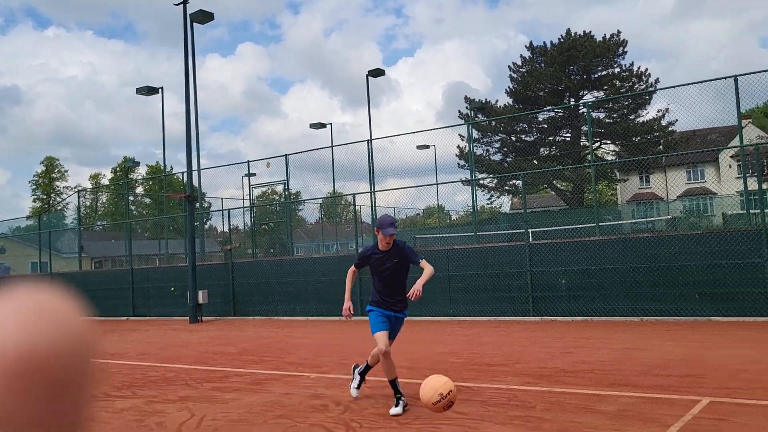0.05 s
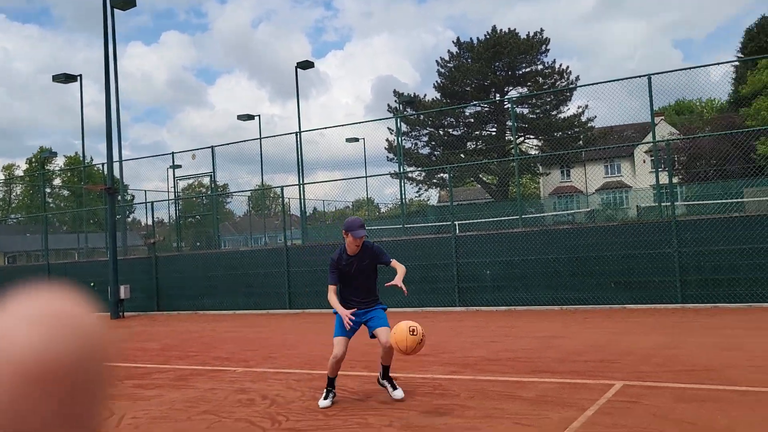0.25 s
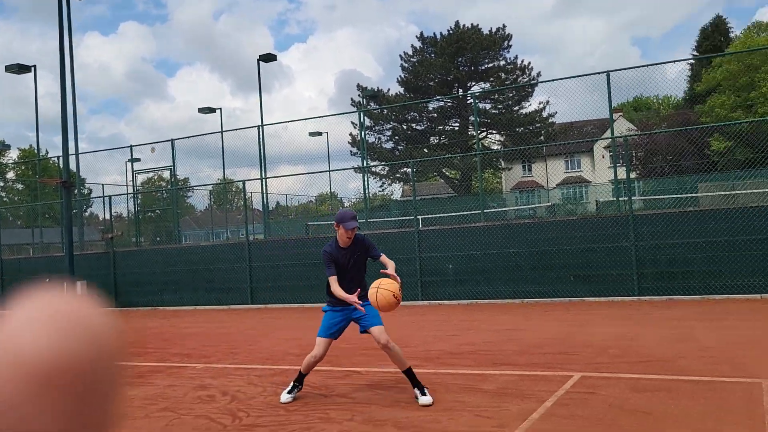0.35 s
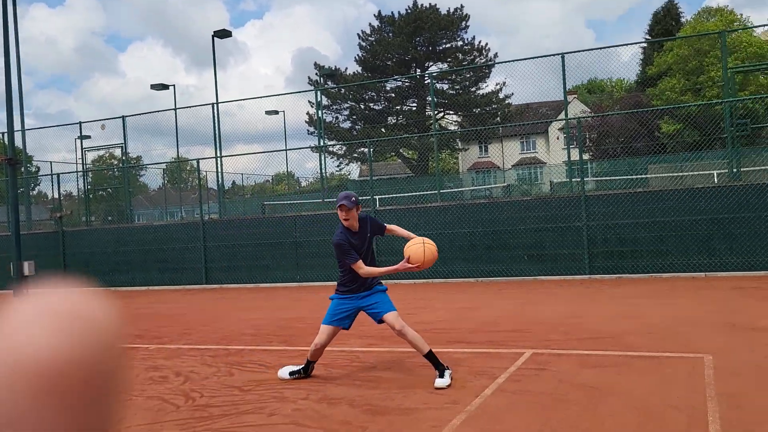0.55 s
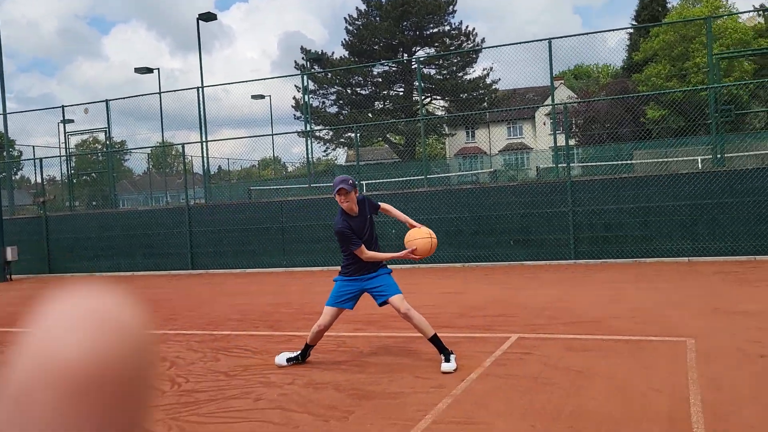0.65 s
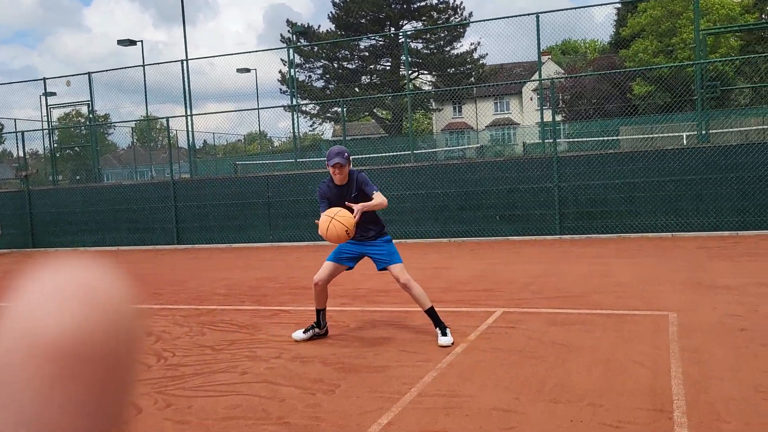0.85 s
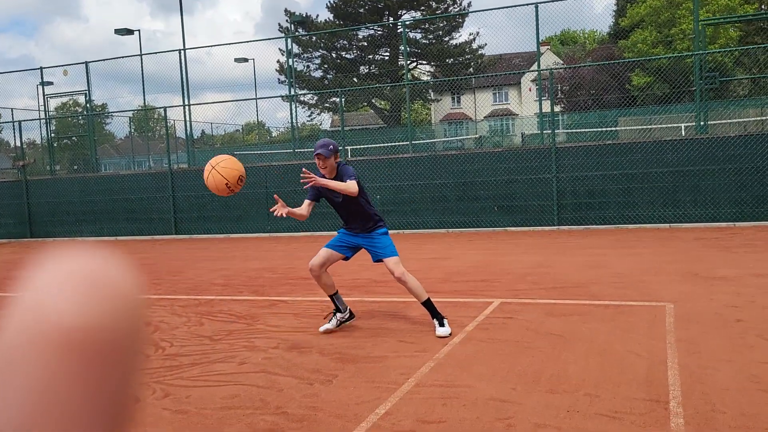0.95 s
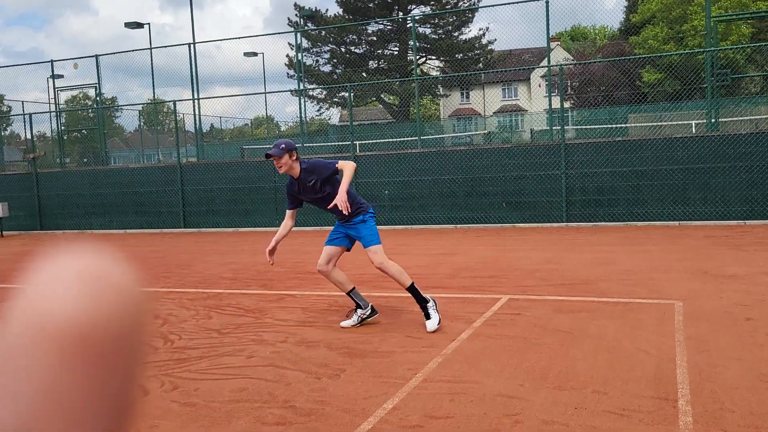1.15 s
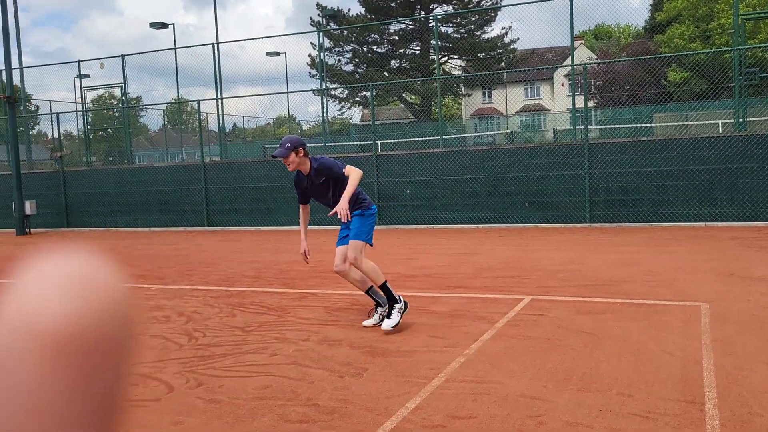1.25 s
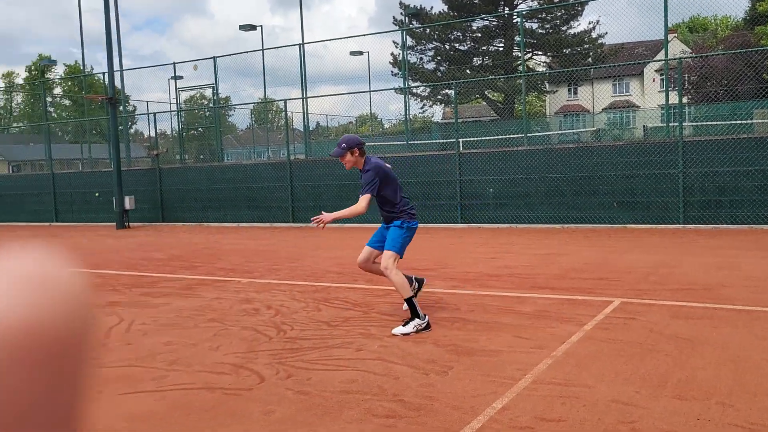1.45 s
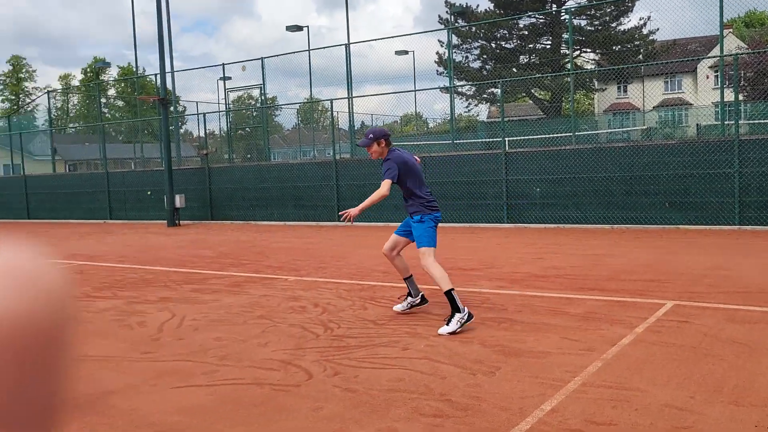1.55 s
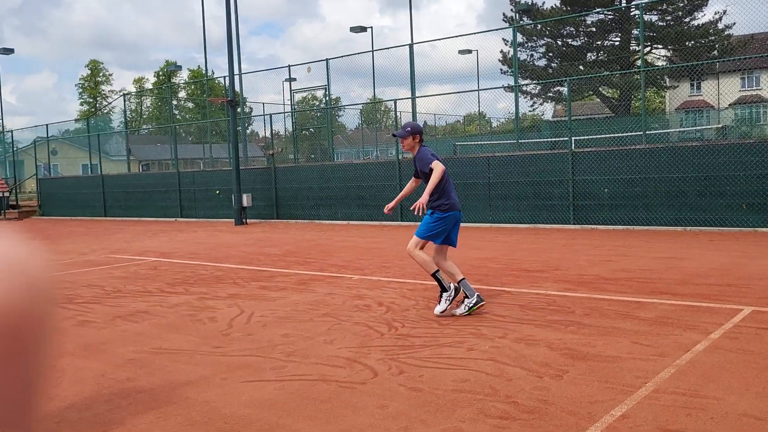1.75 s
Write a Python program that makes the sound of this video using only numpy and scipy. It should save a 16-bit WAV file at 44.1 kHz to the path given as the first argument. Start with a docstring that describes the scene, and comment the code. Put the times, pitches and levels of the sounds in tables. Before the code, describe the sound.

Gritty shoe slide across outdoor clay, with a large ball's thump and thudding steps.

```python
"""Ball play on an outdoor clay court, heard through the two ports of a phone a few metres away.
Wind, distant town noise and faint bird whistles from the start. A step and a scuff; a large ball
smacks the clay and booms with its air cavity. The player catches it in a long slide: soles roll
loose grit, the tread rasps and shudders. Then a push-off and a step away, feet thudding and
crumbs cracking under them."""
import sys
import numpy as np
from scipy import signal
from scipy.fft import rfft, irfft
from scipy.io import wavfile
from scipy.ndimage import uniform_filter1d, map_coordinates

SR = 44100
rng = np.random.default_rng(int(sys.argv[2]) if len(sys.argv) > 2 else 0)


def master_out(mix):
    """Clip the mix to full scale and print it as 16-bit PCM to the path in sys.argv[1]."""
    frames = np.transpose(np.atleast_2d(mix))
    ceiling = np.clip(frames, -1, 1)
    pcm = np.round(ceiling * 32767).astype(np.int16)
    wavfile.write(sys.argv[1], SR, pcm)


N = 79380
T = np.arange(N) / SR
FREQS = np.maximum(np.fft.rfftfreq(N, 1 / SR), 1)

# distant town and trees: freq_hz, gain_db
TOWN_SPECTRUM = [(25, 5.5), (70, -11), (150, -1), (400, -13), (1000, -12.5), (1600, -21), (2400, -17.5),
                 (3700, -22.5), (6000, -31), (9000, -49), (13000, -38.5), (16000, -42)]
# wind rumble: freq_hz, gain_db
WIND_SPECTRUM = [(20, -57), (36, 3), (54, 0.5), (85, -5.5), (130, -16.5), (250, -30), (1000, -62.5)]
# wind envelope: time_s, gain_db
WIND_ENVELOPE = [(0, -57), (.04, -68), (.08, -47.5), (.15, -55), (.44, -49), (.55, -38.5), (.595, -37.5),
                 (.65, -50.5), (.78, -49), (.95, -55), (1.23, -51.5), (1.27, -73), (1.32, -45), (1.65, -56)]
# bird notes: start_s, length_s, first_hz, middle_hz, last_hz, level_db, roughness_ratio
BIRD_NOTES = [(0, .05, 3750, 3300, 2750, -63.5, .6), (0, .06, 2150, 2170, 2120, -67, .1),
              (.047, .03, 3850, 3600, 3480, -57, .9), (.08, .045, 3200, 2850, 2500, -62, .8),
              (.308, .098, 2320, 2710, 2380, -54.5, .2), (1.145, .04, 3900, 3830, 3650, -63, .9),
              (1.16, .1, 4580, 4330, 4480, -64, .9), (1.2, .06, 3550, 3520, 3330, -61.5, .9),
              (1.26, .035, 3500, 3570, 3400, -56.5, .9), (1.29, .055, 3540, 3440, 3520, -60, 1),
              (1.345, .035, 3700, 3790, 3800, -58.5, .7)]
# near reflection, side relative to mid: freq_hz, gain_db
SIDE_RESPONSE = [(110, -20.5), (280, -35), (500, -12.5), (12000, -5)]
# left port relative to right: freq_hz, gain_db
PORT_BALANCE = [(100, 2.5), (600, -1.5), (870, 7), (1600, -0.5), (2200, 9), (3500, 14), (4000, 3),
                (5800, 7), (10000, 2), (14000, -10.5), (16000, -12)]
# right port behind left: time_s, lag_s
PORT_LAGS = [(.48, 0.0000041), (.8, 0.0001), (1.4, 0.00012), (1.7, 0.000055)]
# crumbs bursting under sole or ball: start_s, crack_db, tick_db, t60_s
CRUMB_CRACKS = [(0.054, -43.5, -72, 0.011), (0.2069, -35, -65, 0.011), (0.2536, -63, -80, 0.0083),
                (1.3786, -36.5, -41, 0.027), (1.7303, -56.5, -59, 0.026), (1.777, -58, -53.5, 0.012)]
# bursting crumb: freq_hz, gain_db
CRACK_SPECTRUM = [(500, -30), (1500, -15), (2400, 7.5), (3400, 4), (4700, 3), (7800, -6.5), (9500, -15.5),
                  (13000, -16), (16000, -3)]
# tread rasps: start_s, rise_s, hold_s, release_s, level_db, centre_hz, width_hz
TREAD_RASPS = [(0.053, 0.0027, 0.0016, 0.0088, -51, 4880, 1500),
               (0.126, 0.019, 0.016, 0.066, -49.5, 1230, 446), (.435, .02, 0.064, 0.11, -46, 4560, 1310),
               (0.866, .09, .03, 0.15, -62, 14200, 1250)]
# sole biting the clay: start_s, rise_s, hold_s, release_s, level_db
SOLE_SHUDDERS = [(0.1783, 0.022, 0.0067, 0.069, -38.5), (0.433, 0.021, 0.015, 0.14, -47),
                 (.665, 0.019, 0.041, 0.055, -44), (1.436, 0.0083, 0.013, 0.1, -49.5),
                 (1.3, 0.0082, 0.012, 0.18, -58)]
# sole stick-slip: freq_hz, gain_db
SHUDDER_SPECTRUM = [(60, -35), (150, -5.5), (250, 0.5), (370, -3), (510, 3.5), (680, -12.5), (1200, -53),
                    (4000, -65)]
# long slide: time_s, crunch_db, grit_db, hiss_db
SLIDE_ENVELOPE = [(0.331, -82, -65, -83), (0.37, -68, -61.5, -69), (0.406, -69, -66.5, -75),
                  (0.419, -57, -51, -58), (0.432, -47, -46.5, -64.5), (0.491, -37.5, -42.5, -62.5),
                  (0.728, -42, -52, -72), (0.757, -49, -53.5, -78), (0.834, -45.5, -59, -78),
                  (0.884, -45, -57.5, -68), (0.98, -45, -53.5, -74), (1.06, -51.5, -53, -75),
                  (1.104, -48.5, -57, -78), (1.148, -61, -64.5, -82), (1.22, -55, -61.5, -69),
                  (1.27, -77, -71, -87)]
# short scuffs: start_s, rise_s, hold_s, release_s, crunch_db, grit_db, hiss_db
SOLE_SCUFFS = [(0.086, 0.027, 0.065, 0.14, -54, -55, -69), (0.413, 0.0023, 0.0069, 0.017, -58, -53.5, -68),
               (1.366, 0.0057, 0.014, 0.033, -51.5, -53, -66), (1.384, .008, 0.02, 0.028, -54, -59.5, -67),
               (1.422, 0.022, 0.011, 0.015, -41, -43.5, -58), (1.473, 0.018, 0.011, 0.039, -59.5, -70, -82),
               (1.502, .04, .04, 0.16, -71.5, -68, -91)]
# sole on clay, mid crunch: freq_hz, gain_db
CRUNCH_SPECTRUM = [(100, -17.5), (480, -5.5), (720, -13), (900, -2), (1130, 0), (1550, -3), (1850, -13),
                   (2600, -12.5), (6000, -93)]
# sole on clay, sharp grit: freq_hz, gain_db
GRIT_SPECTRUM = [(1200, -66), (1880, -13), (2200, 1), (2700, 0.5), (3200, -4), (4600, -3.5), (6500, -12.5),
                 (7800, -13.5), (8800, -26.5), (11000, -28), (16000, -31)]
# fine hiss and ticks of clay: freq_hz, gain_db
HISS_SPECTRUM = [(6000, -54), (9000, -11), (11000, -4), (12500, 4), (14200, 0), (16000, -1.5)]
# footfalls and catch: start_s, thump_db, thump_hz, slap_db, slap_hz, smack_db
CONTACTS = [(0.056, -41.5, 116, -35.5, 300, -43), (0.2527, -14.5, 104.7, -20, 300, -25),
            (0.4869, -46, 122, -18, 327, -45), (.503, -22, 93, -22, 262, -53),
            (1.3699, -63, 132, -22.5, 450, -43), (1.378, -31, 144, -16, 319, -26.5),
            (1.4, -33, 111, -25.5, 327, -57), (1.425, -33.5, 156, -31, 237, -67),
            (1.456, -34.5, 92, -34, 264, -46), (1.691, -37, 125, -29, 340, -41.5),
            (1.733, -69, 107, -38, 426, -48)]
# contact smack: freq_hz, gain_db
SMACK_SPECTRUM = [(100, -2.5), (500, 9), (730, -45), (1000, 6), (1400, 1), (1900, -7), (2400, -21),
                  (7500, -47), (16000, -54)]
# ball modes: freq_hz, gain_db, rise_s, t60_s
BALL_MODES = [(84.4, 4.5, 0.0089, 0.045), (183, -1, 0.0035, 0.037), (344.4, -17, 0.01, 0.087),
              (413.5, -13.5, 0.0051, 0.061), (487.6, -11, 0.0054, 0.044), (909, -19.5, 0.019, 0.023),
              (1377, -19.5, 0.00033, 0.025)]
# ball springing back: freq_hz, gain_db
REBOUND_SPECTRUM = [(500, -25), (750, -15), (1000, 5), (1250, 1.5), (1600, -13), (6000, -50)]

CONTACT_RISE_S, SLAP_RISE_S = 0.0005, 0.0026
HISS_APART = 0.82


def undb(db):
    """Decibels to gain."""
    return 10 ** (np.asarray(db) / 20)


def unit(x):
    """Scale to rms 1."""
    return x / np.sqrt(np.mean(x ** 2))


def response(points):
    """Gain per FFT bin from (freq_hz, gain_db) points."""
    hz, db = np.array(points, float).T
    return undb(np.interp(np.log(FREQS), np.log(np.sort(hz)), db))


def colour(x, spectrum):
    """Filter by a spectrum; rms 1."""
    return unit(irfft(rfft(x) * response(spectrum), N))


def noise():
    """White noise."""
    return rng.standard_normal(N)


def walk(rate_hz):
    """Smooth random drift; rms 1."""
    window = max(int(SR / rate_hz), 1)
    smoothed = uniform_filter1d(noise(), window, mode="wrap")
    return unit(uniform_filter1d(smoothed, window, mode="wrap"))


def pair(source, apart):
    """Stereo draw of a source; apart 0 = identical channels, 1 = independent."""
    return np.sqrt(1 - apart ** 2) * source() + apart * np.array([source(), source()])


def swell(start_s, rise_s, hold_s, release_s):
    """Rise, hold, then fall 20 dB per release_s."""
    age_s = T - start_s
    return np.clip(age_s / rise_s, 0, 1) * 10 ** (-np.maximum(age_s - rise_s - hold_s, 0) / release_s)


def strike(start_s, rise_s, t60_s):
    """Impact envelope: linear rise, exponential decay."""
    age_s = np.maximum(T - start_s, 0)
    decay = np.exp(-np.log(1000) * np.maximum(age_s - rise_s / 2, 0) / t60_s)
    return np.minimum(age_s / rise_s, 1) * decay


def ring(start_s, freq_hz, rise_s, t60_s):
    """One damped mode."""
    return -np.sin(2 * np.pi * freq_hz * (T - start_s)) * strike(start_s, rise_s, t60_s)


def grains(rate_per_s=14000, spread_db=1.5):
    """Dense clicks of clay crumbs, a few larger than the rest."""
    present = rng.random(N) < rate_per_s / SR
    return present * np.sign(noise()) * undb(spread_db * np.minimum(rng.exponential(size=N), 6))


def town(level_db=-57, drift_db=0.37):
    """Near-steady wash of distant town and trees."""
    return undb(level_db + drift_db * walk(rate_hz=2.3)) * colour(pair(noise, apart=0.7), TOWN_SPECTRUM)


def wind(trim_db=1.5):
    """Low rumble in gusts."""
    gusts_db = np.interp(T, *np.array(WIND_ENVELOPE).T)
    return undb(trim_db + gusts_db) * colour(pair(noise, apart=0.41), WIND_SPECTRUM)


def birds(overtone_db=-18, overtone_below_hz=2800, flutter_db=2.5, echo_db=-7):
    """Distant whistled glides, pure to wavering; only low notes carry an overtone."""
    out, slow, fast = 0, walk(rate_hz=150), walk(rate_hz=803)
    for start_s, length_s, first_hz, middle_hz, last_hz, level_db, roughness in BIRD_NOTES:
        progress = np.clip((T - start_s) / length_s, 0, 1)
        arch = np.sin(np.pi * progress)
        bend_hz = middle_hz - (first_hz + last_hz) / 2
        glide_hz = first_hz + (last_hz - first_hz) * progress + bend_hz * arch
        waver = 1 + 0.005 * slow + 0.03 * roughness * fast
        phase = 2 * np.pi * np.cumsum(glide_hz * waver) / SR
        overtone = undb(overtone_db) * (middle_hz < overtone_below_hz) * np.sin(2 * phase)
        out = out + undb(level_db) * np.sqrt(np.abs(arch)) * (np.sin(phase) + overtone)
    out = out * undb(flutter_db * walk(rate_hz=45))
    return out + undb(echo_db) * echo(out)


def echo(x):
    """Thin scatter from fences and houses."""
    spectrum = [(60, -28), (400, 4.5), (2500, 3.5), (12000, -4)]  # freq_hz, gain_db
    tail = np.array([colour(noise(), spectrum) for _ in range(2)])
    tail = tail * strike(start_s=0.019, rise_s=0.016, t60_s=0.28)
    tail = tail / np.sqrt(np.sum(tail ** 2) / 2)
    return signal.fftconvolve(np.atleast_2d(x), tail, axes=1)[:, :N]


def side_reflection(x, delay_s=0.004):
    """Near sideways reflection: delayed mid, opposite polarity per channel."""
    delay = np.exp(-2j * np.pi * FREQS * delay_s)
    side = irfft(rfft(x.mean(axis=0)) * response(SIDE_RESPONSE) * delay, N)
    return np.array([side, -side])


def ports(x):
    """Two ports colour the court differently; the left leads more as the player moves left."""
    balance = response(PORT_BALANCE)
    gains = np.array([balance, np.ones_like(balance)]) * 2 / (1 + balance)
    left, right = irfft(rfft(x) * gains, N)
    lag_s = np.interp(T, *np.array(PORT_LAGS).T)
    return np.array([left, map_coordinates(right, [(T - lag_s) * SR], mode="mirror")])


def cracks():
    """Crumbs burst under sudden load: a crack plus a fine tick."""
    crack = colour(pair(noise, apart=1.0), CRACK_SPECTRUM)
    tick = colour(pair(noise, HISS_APART), HISS_SPECTRUM)
    return sum((undb(crack_db) * crack + undb(tick_db) * tick) * strike(start_s, CONTACT_RISE_S, t60_s)
               for start_s, crack_db, tick_db, t60_s in CRUMB_CRACKS)


def rasps(sag_per_s=0.37):
    """Tread rings in a narrow band as crumbs catch; the band sinks as the sole slows."""
    out = 0
    for start_s, rise_s, hold_s, release_s, level_db, centre_hz, width_hz in TREAD_RASPS:
        sinking_hz = centre_hz * np.exp(-sag_per_s * np.maximum(T - start_s, 0))
        carrier = np.exp(2j * np.pi * np.cumsum(sinking_hz) / SR)
        lowpass = signal.butter(2, width_hz / 2, fs=SR, output="sos")
        # moving band-pass: shift down, low-pass, shift back
        band = signal.sosfilt(lowpass, pair(grains, apart=0.7) * carrier.conj()) * carrier
        out = out + undb(level_db) * swell(start_s, rise_s, hold_s, release_s) * unit(band.real)
    return out


def shudders():
    """Low stick-slip rasp of a loaded sole."""
    envelope = sum(undb(level_db) * swell(*timing) for *timing, level_db in SOLE_SHUDDERS)
    return envelope * colour(pair(grains, apart=0.15), SHUDDER_SPECTRUM)


def sliding(judder_db=0.8):
    """Soles roll crumbs over clay: crunch, grit and fine hiss, juddering together."""
    time_s, *slide_db = np.array(SLIDE_ENVELOPE).T
    # spectrum, trim_db, apart
    layers = [(CRUNCH_SPECTRUM, 1, 0.18), (GRIT_SPECTRUM, 2, 0.81), (HISS_SPECTRUM, 5, HISS_APART)]
    out = 0
    for layer, (spectrum, trim_db, apart) in enumerate(layers):
        drag = undb(np.interp(T, time_s, slide_db[layer], left=-120, right=-120))
        for start_s, rise_s, hold_s, release_s, *scuff_db in SOLE_SCUFFS:
            drag = drag + undb(scuff_db[layer]) * swell(start_s, rise_s, hold_s, release_s)
        out = out + undb(trim_db) * drag * colour(pair(grains, apart), spectrum)
    return out * undb(judder_db * walk(rate_hz=230))


def thuds(upper_ratio=1.387, upper_db=-7.5, slap_t60_s=0.025):
    """Footfalls and catch: low thump, hollow two-mode slap, short smack."""
    out, smack_noise = 0, colour(pair(noise, apart=0.9), SMACK_SPECTRUM)
    for start_s, thump_db, thump_hz, slap_db, slap_hz, smack_db in CONTACTS:
        thump = ring(start_s, thump_hz, rise_s=0.006, t60_s=0.056)
        slap = ring(start_s, slap_hz, SLAP_RISE_S, slap_t60_s)
        slap += undb(upper_db) * ring(start_s, slap_hz * upper_ratio, SLAP_RISE_S, slap_t60_s)
        smack = smack_noise * strike(start_s, CONTACT_RISE_S, t60_s=0.012)
        out = out + undb(thump_db) * thump + undb(slap_db) * slap + undb(smack_db) * smack
    return out


def bounce(start_s=0.2065, squash_s=0.0106, boom_db=-8, smack_db=-24.5, ping_db=-31):
    """The ball smacks the clay, booms with its air cavity, pings as it springs back into shape."""
    boom = sum(undb(gain_db) * ring(start_s, freq_hz, rise_s, t60_s)
               for freq_hz, gain_db, rise_s, t60_s in BALL_MODES)
    smack = colour(pair(noise, apart=0.94), SMACK_SPECTRUM)
    smack *= strike(start_s, CONTACT_RISE_S, t60_s=0.024)
    ping = colour(noise(), REBOUND_SPECTRUM) * strike(start_s + squash_s, SLAP_RISE_S, t60_s=0.033)
    return undb(boom_db) * boom + undb(smack_db) * smack + undb(ping_db) * ping


def scene():
    """Player and ball with their reflections, over birds, town and wind."""
    court = ports(sliding() + rasps() + shudders() + thuds() + cracks() + bounce())
    return court + side_reflection(court) + undb(-22) * echo(court) + birds() + town() + wind()


def record(dry):
    """The phone cuts the deepest rumble and the top."""
    low_cut_hz, top_hz = 56, 16000
    x = signal.sosfilt(signal.butter(3, low_cut_hz, "high", fs=SR, output="sos"), dry)
    return signal.sosfilt(signal.ellip(10, .2, 80, top_hz, fs=SR, output="sos"), x)


dry = scene()
out = record(dry)
master_out(out)
```